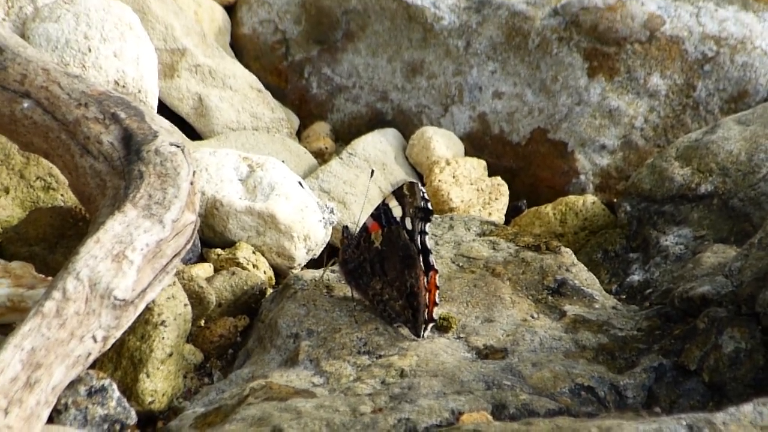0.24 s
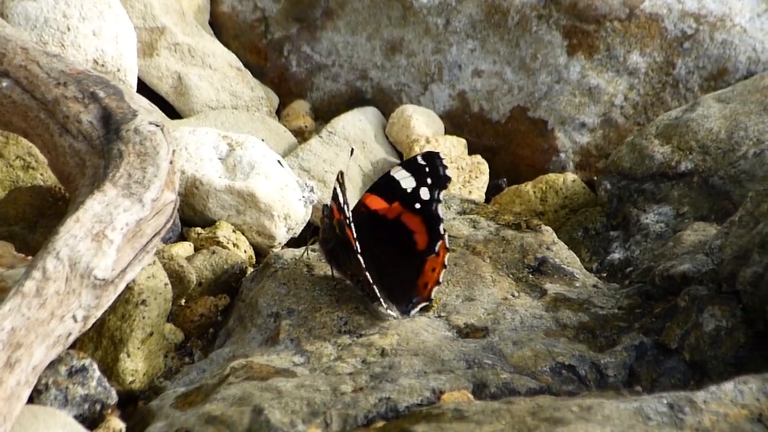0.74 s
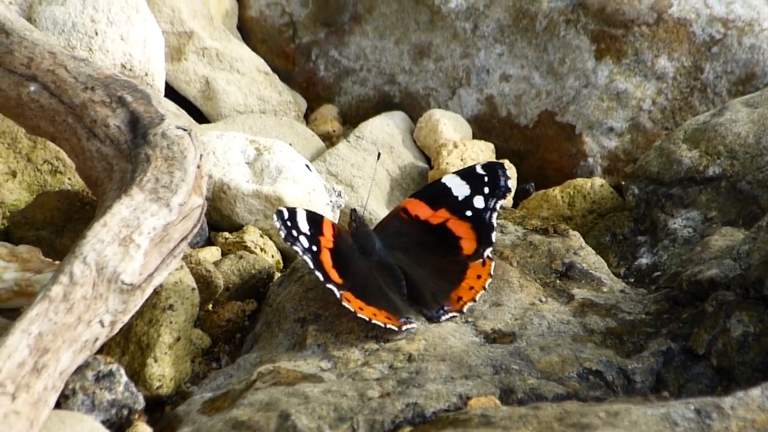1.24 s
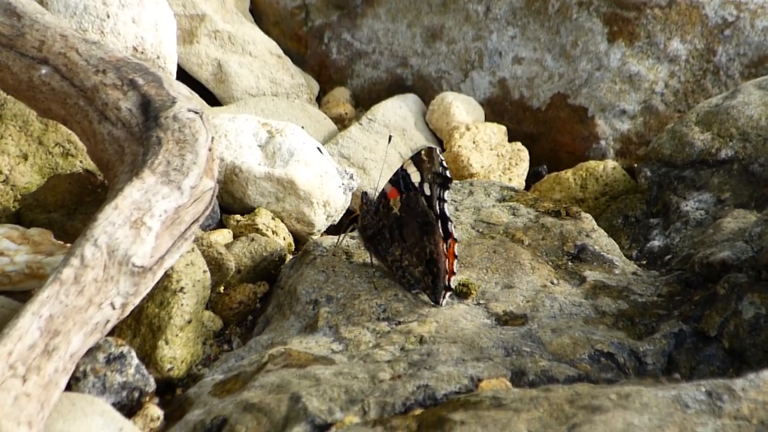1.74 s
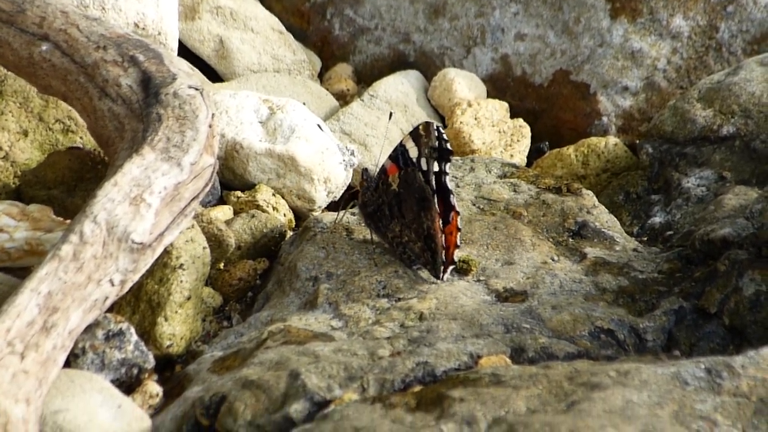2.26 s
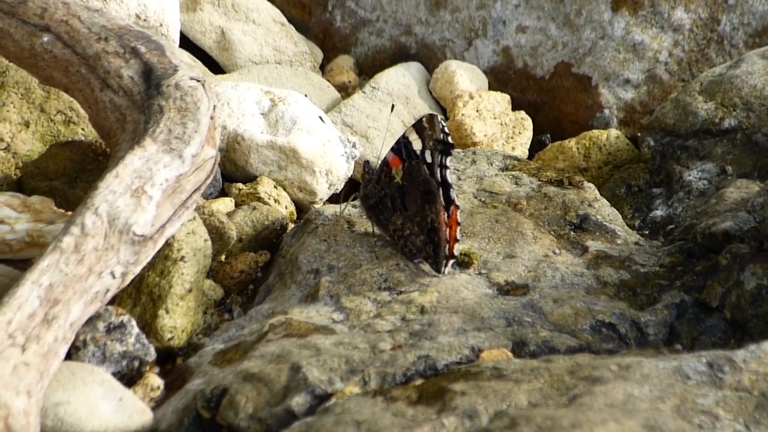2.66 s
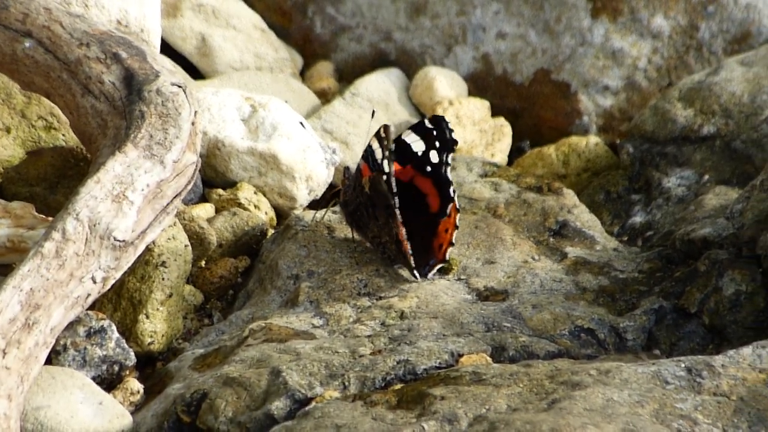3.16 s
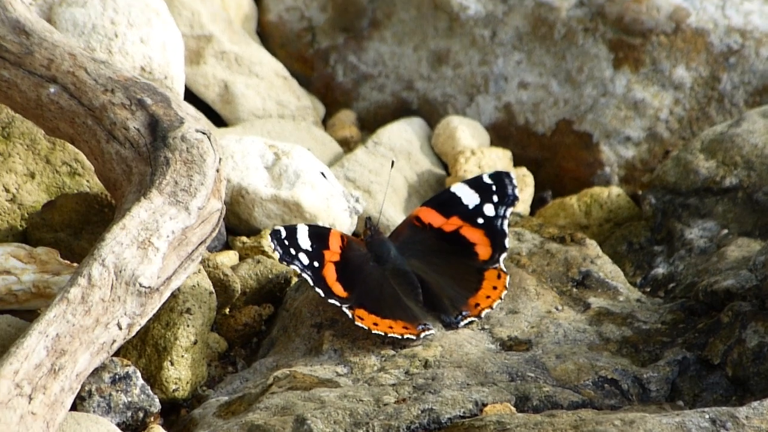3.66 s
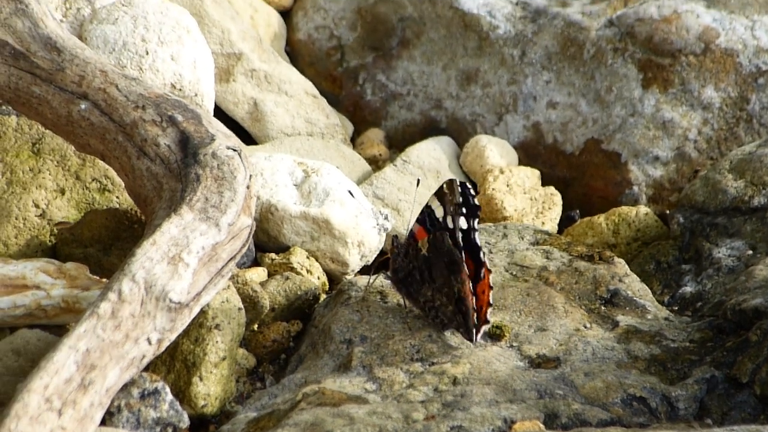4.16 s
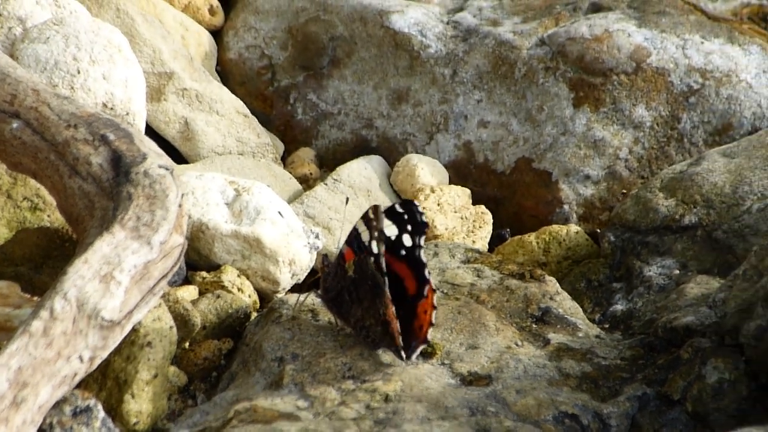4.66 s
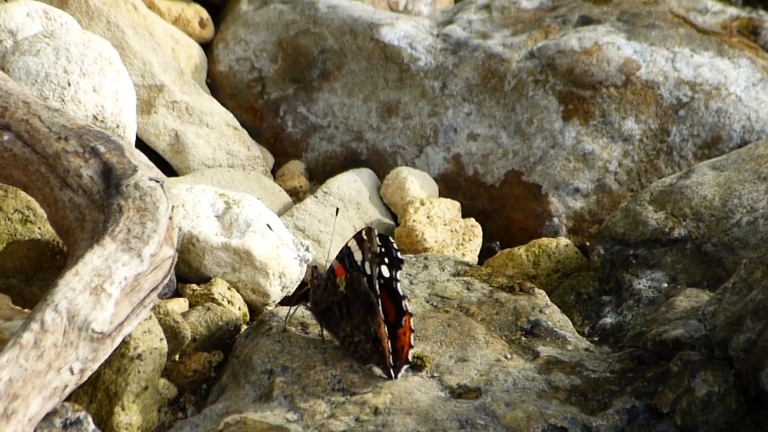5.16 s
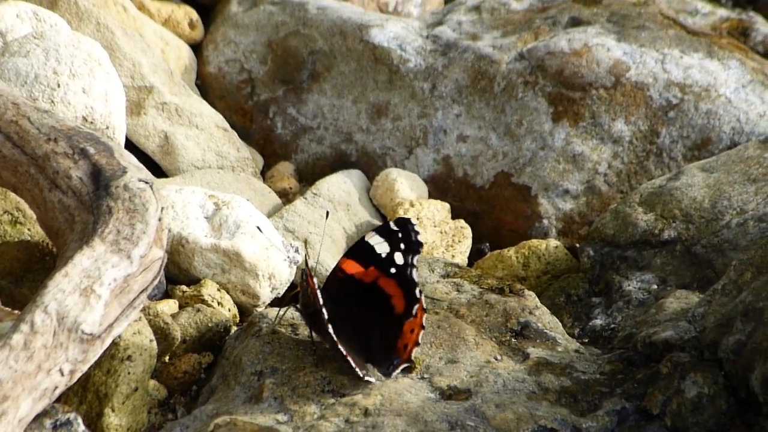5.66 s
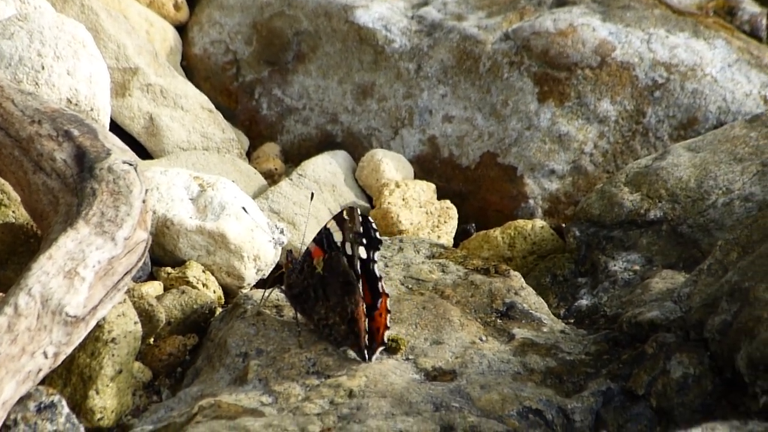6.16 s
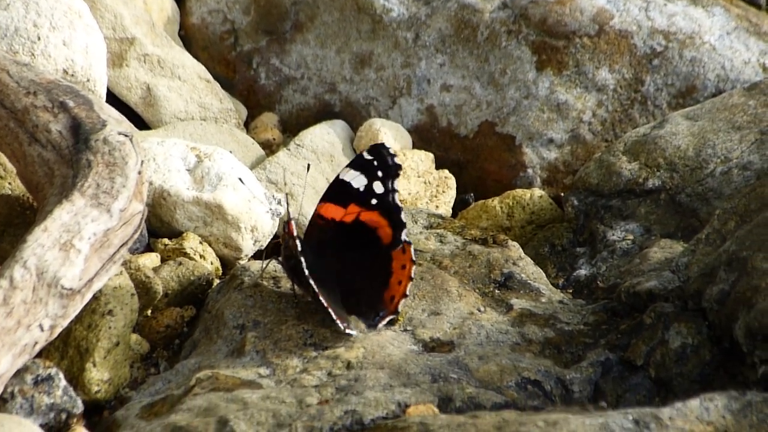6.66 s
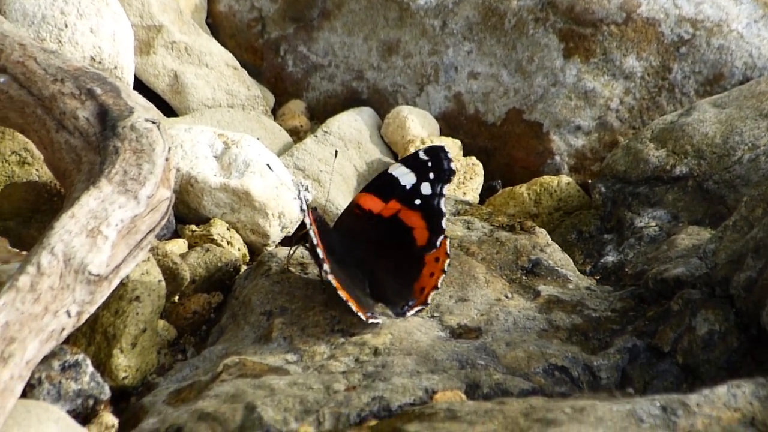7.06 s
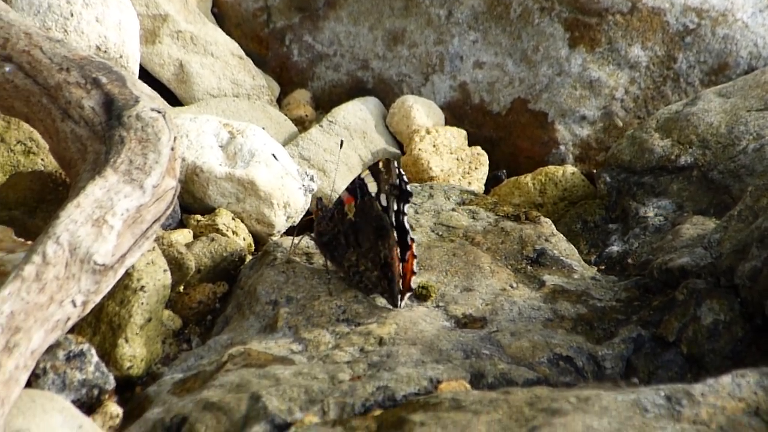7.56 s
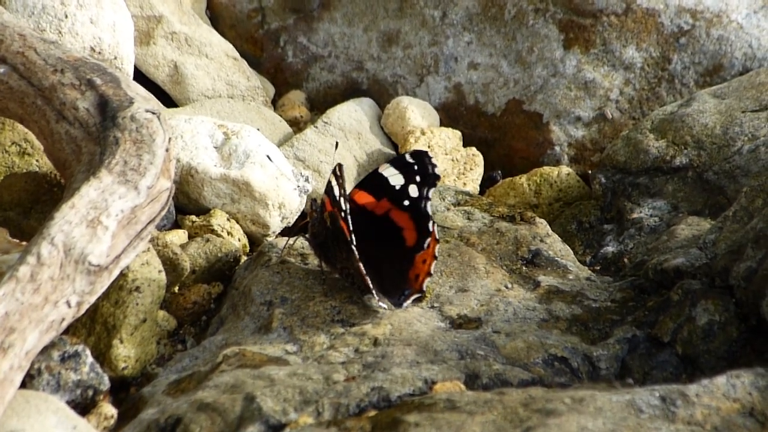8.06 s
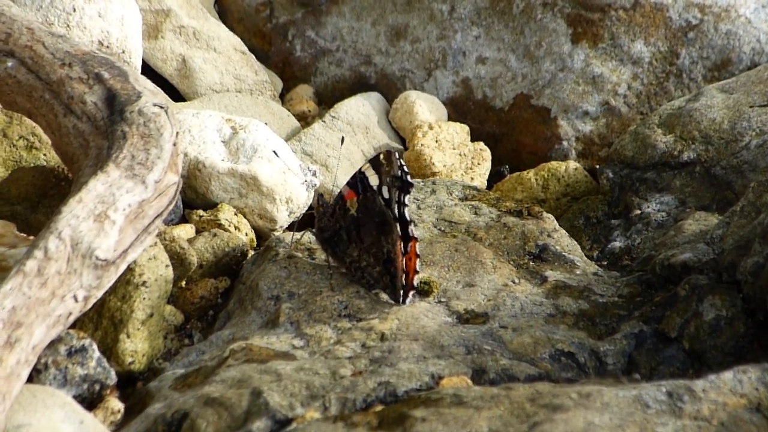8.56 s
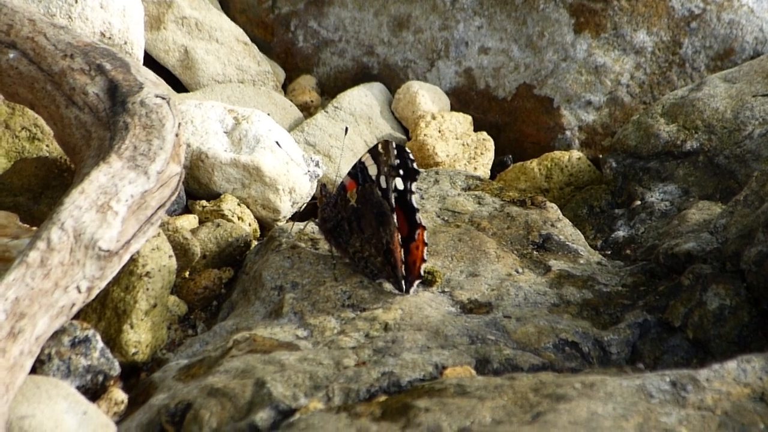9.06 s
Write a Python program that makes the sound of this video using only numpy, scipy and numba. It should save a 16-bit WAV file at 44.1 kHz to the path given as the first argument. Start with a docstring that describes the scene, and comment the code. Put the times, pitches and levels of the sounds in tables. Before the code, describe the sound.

Close among rocks, little waves lap, splash and drain with crackling bubbles and ringing drops, while light wind softly buffets the microphone.

```python
"""A stony shore, heard from close among the rocks: small waves run up, slosh between stones and drain fizzing.
Slosh, fizz and trickle are crowds of short ringing bubbles, the first two over shaped noise.
Crests slap in short bursts, air pockets glug as gliding sines and drops fall back as ringing ticks.
Water farther along the shore hisses almost steadily, as noise coming without echoes from the rocks.
Gusts of a light breeze rumble on the two microphone ports, as lumpy low noise."""
import sys
import numpy as np
from scipy import signal
from scipy.fft import rfft, irfft, next_fast_len
from scipy.io import wavfile
from numba import njit

SR = 44100
rng = np.random.default_rng(int(sys.argv[2]) if len(sys.argv) > 2 else 0)


def to_wav(sig):
    """Store sig (one row per channel, or 1-D mono) as 16-bit WAV at the path in sys.argv[1].

    Samples outside -1..1 are clipped; the rate is SR.
    """
    pcm = np.clip(np.atleast_2d(sig), -1, 1) * 32767
    pcm = np.round(pcm).astype(np.int16)
    wavfile.write(sys.argv[1], SR, pcm.T)  # frames by channels


N = 411012   # length in samples

# spectrum shared by fizz and spray, with a peak near 4 kHz and a dip near 2.6 kHz: f/Hz, relative level per
# Hz/dB
FIZZ_COLOUR = [(1800, -1), (2600, -5), (3300, -2.5), (4050, 5.5), (4450, 4), (6500, 2.5), (8000, 0),
               (10000, -9.5), (12500, -17), (16000, -37)]
# stereo width of the shore at the two ports: f/Hz, side against mid/dB
SHORE_SPREAD = [(60, -11), (300, 2.5), (700, 0), (1300, -4), (4400, -15.5), (8000, -8.5)]


def water_levels(calm_slosh_db=-54.5, calm_fizz_db=-51.5, foam_lag_s=0.0061):
    """Slosh and fizz levels in dB: calm water, waves and slaps add in power; wave fizz lags the water a little."""
    # waves: t/s, run-up/s, wash/s, drain rate/(dB/s), slosh level/dB, fizz level/dB
    waves = [(0.4, 0.02, 0.33, 35, -48.5, -50), (0.73, 0.004, 0.14, 12.5, -44.5, -40),
             (1.15, 0.044, 1.47, 57, -44.5, -39.5), (2.92, 0.21, 1, 9, -48.5, -48.5),
             (3.66, 0.22, 0.62, 11.5, -39.5, -36.5), (6.16, 0.18, 0.58, 19, -37, -34.5),
             (8.3, 0.13, 0.68, 13, -50, -46.5)]
    # crests slapping on a stone and collapsing: t/s, slosh level/dB, fizz level/dB
    slaps = [(0.462, -41, -40.5), (0.745, -44.5, -31.5), (1.469, -40, -31), (2.485, -32, -32),
             (2.685, -37, -37), (3.902, -34, -35), (3.968, -50, -32.5), (4.047, -49, -28),
             (4.097, -37, -39), (4.401, -33.5, -28), (4.467, -40, -30.5), (4.877, -45, -28.5),
             (5.269, -60, -38), (6.277, -41.5, -26.5), (6.548, -35, -25.5), (6.766, -30, -27.5),
             (6.868, -38, -28), (6.909, -38, -32.5), (7.405, -44, -33.5)]
    body_power = from_db(calm_slosh_db) ** 2
    foam_power = from_db(calm_fizz_db) ** 2
    for s, run_up, wash, drain, slosh_db, fizz_db in waves:
        water = swell(s, run_up, wash, drain)
        foam = swell(s + foam_lag_s, run_up, wash, drain)
        body_power = body_power + (from_db(slosh_db) * water) ** 2
        foam_power = foam_power + (from_db(fizz_db) * foam) ** 2
    for s, slosh_db, fizz_db in slaps:
        burst = swell(s, attack_s=0.001, hold_s=0.011, fall_db_per_s=271)
        body_power = body_power + (from_db(slosh_db) * burst) ** 2
        foam_power = foam_power + (from_db(fizz_db) * burst) ** 2
    return 10 * np.log10(body_power), 10 * np.log10(foam_power)


def slosh(level_db, spill, gurgle_top_hz=1650):
    """Large, low bubbles over a soft churn; the harder the water runs, the more the bubbles take over."""
    # colour of the wave body: f/Hz, relative level per Hz/dB
    body_colour = [(230, -34), (380, -8.5), (520, -3.5), (750, 4), (1050, 4.5), (1550, 0.5), (2200, 1),
                   (2600, -1), (3400, -6)]
    low_colour = [(hz, db) for hz, db in body_colour if hz < gurgle_top_hz]
    crowd = from_db(0.25 * (level_db - level_db.mean()))
    gurgle = bubbles(low_colour, 680 * crowd * spill, cycles=42, rise=0.5, size_spread_db=3.9)
    gurgle = gurgle * np.sqrt(crowd)
    churn = spill * stereo_noise(body_colour, SHORE_SPREAD)
    surge_db = 1.2 * drift(17)
    return from_db(level_db + surge_db) * (from_db(-1.5) * gurgle + from_db(-5.0) * churn)


def fizz(level_db, spill):
    """Tiny bubbles burst in dense, merging clusters as water drains through the stones."""
    crackle = bubbles(FIZZ_COLOUR, 2000 * spill ** 2, cycles=18, rise=0.02, size_spread_db=4.5)
    foam = stereo_noise(FIZZ_COLOUR, SHORE_SPREAD)
    surge_db = 1.2 * drift(12.6)
    return from_db(level_db + surge_db) * (from_db(-3.0) * crackle + from_db(-3.5) * foam)


def trickle(level_db, spill):
    """Running water spits off the stones in flurries of very short plips."""
    # colour of the spitting: f/Hz, relative level per Hz/dB
    spit_colour = [(1100, -7.5), (1550, 7.5), (2100, 3.5), (2600, -6.5), (3300, 5.5), (5000, -1)]
    running = from_db(level_db - level_db.max())
    plips = bubbles(spit_colour, 650 * np.sqrt(running) * spill, cycles=15, rise=0, size_spread_db=4.4)
    return from_db(level_db - 5.5) * plips


def drops(cycles=10, spatter_cycles=5, spatter_t60=0.11, spray_db=-3, impact_db=-8,
          linger_db=-5, linger_cycles=60, linger_t60=0.16):
    """A drop ticks and rings; a spatter of like droplets and fine spray follows, and their pitch lingers."""
    # drops on water and stone: t/s, relative ring peak/dB, ring f/Hz, spatter against ring peak/dB
    falls = [(0.451, -20.5, 8400, -19), (0.468, -28, 1930, -15), (0.749, -24, 2120, -22),
             (1.021, -21.5, 6340, -15), (1.3352, -14.5, 3900, -15.5), (1.4712, -19, 4900, -22),
             (1.4965, -20, 8400, -12), (1.546, -14.5, 8740, -19), (1.694, -18.5, 3870, -16.5),
             (1.792, -22.5, 3550, -16), (1.929, -9.5, 5940, -22.5), (1.976, -26, 3900, -26),
             (2.003, -9.5, 4470, -20), (2.331, -22.5, 2850, -14), (2.4873, -15.5, 3020, -18),
             (2.4974, -15, 1337, -29), (2.516, -17.5, 3150, -36), (2.722, -26, 1430, -15),
             (2.910, -22.5, 5500, -10), (3.04, -23.5, 5260, -11.5), (3.237, -27, 4030, -11.5),
             (3.303, -39.5, 1280, -3), (3.903, -27, 2740, -10.5), (4.189, -22.5, 1860, -18),
             (4.194, -16.5, 3640, -29), (4.254, -13, 2700, -15.5), (4.417, -19.5, 1400, -21),
             (4.468, -15, 1200, -15), (4.5965, -14, 7500, -14.5), (4.761, -28, 4080, -8),
             (5.2, -21.5, 3970, -12.5), (5.480, -17.5, 4200, -20), (6.158, -29.5, 8000, -9.5),
             (6.272, -7.5, 5120, -26), (6.9683, -21.5, 2380, -6), (7.009, -18.5, 7800, -16),
             (7.1169, -21, 3280, -10.5), (7.218, -14, 5740, -16.5), (7.321, -27.5, 2190, -10.5),
             (7.408, -21, 3070, -20), (7.4237, -21, 3060, -26), (7.535, -28.5, 2280, -14),
             (7.859, -33.5, 2830, -17), (8.678, -31, 1020, -11), (8.7065, -21.5, 6740, -21),
             (9.086, -30, 6500, -12), (9.131, -34.5, 1460, -6)]
    out = np.zeros(N)
    t = np.arange(SR // 6) / SR
    tick = 1. * (t == 0)
    sprays = stereo_noise(FIZZ_COLOUR, SHORE_SPREAD)[0]
    for s, peak_db, hz, spatter_db in falls:
        # two resonances in a row soften the start
        plip = ring(ring(tick, hz, cycles), hz, cycles)
        plip = plip / np.abs(plip).max()
        droplets = rng.standard_normal(len(t)) * rng.exponential(1, len(t))
        spray = sprays[round(s * SR):][:len(t)]
        spatter = rms_one(ring(ring(droplets, hz, spatter_cycles), hz, spatter_cycles))
        spatter = from_db(-60 * t / spatter_t60) * (spatter + from_db(spray_db) * spray)
        linger = rms_one(ring(droplets[::-1], hz, linger_cycles))
        linger = from_db(linger_db - 60 * t / linger_t60) * linger
        tail = from_db(spatter_db) * (spatter + linger)
        add(out, s, from_db(peak_db) * (from_db(impact_db) * tick + plip + tail))
    return out


def glugs(fade_db=6.0, flutter=0.4, wobble=0.023, companion_db=-14, companion_spread=0.448,
          overtone=1.85, overtone_db=-14, count=3):
    """Trapped air rings, climbing near the surface or sinking when dragged down; smaller pockets split off."""
    # air pockets closing between stones: t/s, relative level/dB, start f/Hz,
    # f before wobble one length later/Hz, length/s
    pockets = [(0.404, -35, 1104, 1300, 0.02), (0.611, -43, 615, 540, 0.038), (0.72, -35, 665, 715, 0.018),
               (0.793, -41.5, 713, 530, 0.067), (1.386, -25.5, 1070, 1190, 0.016),
               (1.434, -32, 1140, 1070, 0.012), (1.528, -43, 292, 350, 0.042),
               (1.664, -37.5, 674, 766, 0.035), (2.024, -35, 513, 935, 0.042),
               (2.258, -35.5, 624, 1410, 0.054), (2.516, -31.5, 655, 1470, 0.064),
               (2.753, -41, 860, 695, 0.03), (2.951, -36, 750, 710, 0.031), (3.027, -42.5, 666, 640, 0.023),
               (3.116, -44, 960, 737, 0.05), (3.171, -43.5, 651, 1000, 0.054),
               (3.257, -47.5, 480, 737, 0.049), (3.723, -37.5, 605, 775, 0.053),
               (3.793, -41, 574, 716, 0.043), (3.9, -21.5, 920, 1690, 0.014),
               (4.046, -35.5, 560, 438, 0.053), (4.313, -37, 562, 605, 0.058),
               (4.473, -27, 652, 1036, 0.029), (4.85, -41, 553, 1710, 0.044),
               (6.195, -41.5, 475, 915, 0.038), (6.41, -32.5, 1004, 1160, 0.024),
               (6.738, -33, 444, 576, 0.034), (6.849, -28, 830, 1110, 0.02), (6.91, -27, 904, 1235, 0.021),
               (7.36, -35.5, 946, 1430, 0.027), (7.518, -37, 487, 626, 0.039),
               (7.579, -30.5, 990, 1090, 0.011), (7.643, -39, 960, 1090, 0.019),
               (8.55, -43.5, 722, 925, 0.046)]
    out = np.zeros(N)
    shake = 1 + flutter * drift(74)       # level flutter
    squeeze = 1 + wobble * drift(153)     # pitch wobble
    rattle = from_db(overtone_db) * drift(120)
    for s, level_db, first_hz, last_hz, length in pockets:
        for k, (late, small) in enumerate(rng.random((count, 2))):
            split = k > 0
            # a smaller pocket rings higher and is gone sooner
            shrink = 1 + split * companion_spread * small
            start = s + split * late * length
            age = np.arange(SR // 10) / SR / length * shrink   # in pocket lengths
            now = round(start * SR) + np.arange(len(age))
            glide = (last_hz / first_hz) ** np.minimum(age, 1.2) ** 1.66
            phase = 2 * np.pi * np.cumsum(shrink * first_hz * glide * squeeze[now]) / SR
            fade = from_db(level_db + split * companion_db - fade_db * age)
            envelope = (1 - np.exp(-age / 0.26)) * fade / (1 + age ** 10)
            add(out, start, envelope * (np.sin(phase) + rattle[now] * np.sin(overtone * phase)))
    return from_db(4.0) * out * shake


def among_rocks(x, t60=0.12, mid_db=-14, side_db=-18.5):
    """Nearby boulders scatter the sound in a short spray of echoes, different at each port."""
    t = np.arange(SR // 8) / SR
    echoes = rng.standard_normal((2, len(t))) * from_db(-60 * t / t60)
    echoes /= np.linalg.norm(echoes, axis=1, keepdims=True)
    mid, side = signal.oaconvolve(x.mean(axis=0, keepdims=True), echoes)[:, :N]
    return x + from_db(mid_db) * mid + from_db(side_db) * side * [[1], [-1]]


def far_shore():
    """Water farther along the shore blends into a hiss whose level drifts only slightly."""
    # colour of the distant water: f/Hz, relative level per Hz/dB
    distant_colour = [(25, -11), (60, -4.5), (150, 2), (650, 3.5), (1000, 3.5), (1700, -3.5), (2900, -9),
                      (4050, 1.5), (5500, 3.5), (7500, -0.5), (10000, -11), (16000, -25)]
    level_db = -48 + 1.0 * drift(3.4)
    return from_db(level_db) * stereo_noise(distant_colour, SHORE_SPREAD)


def breeze(lumps_db=3.5, build_share=0.37, drop_db_per_s=96):
    """Eddies buffet the ports in lumps under each gust, which builds for a share of its length, then blows."""
    # gusts: t/s, length before dropping away/s, rumble level before the lumps/dB
    gusts = [(0.216, 0.99, -37), (1.37, 0.51, -46.5), (3.972, 0.89, -34), (4.717, 0.86, -36.5),
             (6.577, 0.6, -36.5), (7.29, 0.07, -37), (7.41, 0.8, -38), (8.332, 0.14, -41.5),
             (8.59, 0.33, -42), (9.07, 0.19, -38.5)]
    # colour of the rumble: f/Hz, relative level per Hz/dB
    rumble_colour = [(45, -51), (70, -25), (100, -7.5), (150, -2.5), (220, 1), (330, -2.5), (480, -8.5),
                     (700, -21), (1400, -39)]
    # close ports hear turbulence mostly in opposite phase: f/Hz, side against mid/dB
    rumble_spread = [(60, 4), (120, 5.5), (250, 15), (500, 15.5)]
    power = np.zeros(N)
    for s, length, db in gusts:
        gust = swell(s, build_share * length, (1 - build_share) * length, drop_db_per_s)
        power += (from_db(db) * gust) ** 2
    lumps = from_db(lumps_db * drift(24))
    return np.sqrt(power) * lumps * stereo_noise(rumble_colour, rumble_spread)


def swell(start, attack_s, hold_s, fall_db_per_s):
    """A gain that rises evenly to 1, holds and dies away."""
    out = np.zeros(N)
    age = np.arange(0, attack_s + hold_s + 60 / fall_db_per_s, 1 / SR)
    fall_db = -fall_db_per_s * np.maximum(age - attack_s - hold_s, 0)
    add(out, start, np.minimum(age / attack_s, 1) * from_db(fall_db))
    return out


def spills(strength, per_s=50, drain_s=0.012):
    """Water tips over stone after stone: each spill starts at once and drains away; a gain with rms 1."""
    kicks = (rng.random(N) < per_s / SR) * rng.random(N) ** 2
    draining = signal.lfilter([1], [1, -np.exp(-1 / (drain_s * SR))], kicks)
    return rms_one(1 + 2 * strength * draining)


def bubbles(spectrum, per_s, cycles, rise, size_spread_db, largest_share=0.02):
    """Bubbles of any pitch are born at random and ring, gliding up by rise on average; most are small; rms 1."""
    born = np.flatnonzero(rng.random(N) < per_s / SR)
    pitch, size, life, climb = rng.random((N, 4))[born].T
    low_hz, high_hz = spectrum[0][0], spectrum[-1][0]
    hz = low_hz * (high_hz / low_hz) ** pitch
    # the smallest draws make the tallest bubbles; a few share the full size
    size_gain = from_db(-size_spread_db * np.log(np.maximum(size, largest_share)))
    # high bubbles die sooner, so they need more height for the same power per Hz
    height = hz * at_hz(spectrum, hz) * size_gain
    return rms_one(chirps(born, hz, height, cycles * (.5 + life), 2 * rise * climb))


@njit
def chirps(starts, hz, heights, cycles, rise):
    """Sum of softly starting sines that die by 60 dB in so many cycles, each gliding up by its share rise."""
    out = np.zeros(N)
    for k in range(len(starts)):
        size = cycles[k] * SR / hz[k]   # life in samples
        step = hz[k] / SR               # cycles per sample
        fade = np.exp(-np.log(1000) / size)
        opening = np.exp(-step)
        height, closed, phase = heights[k], 1., 0.
        for i in range(min(int(size), N - starts[k])):
            phase += 2 * np.pi * step * (1 + rise[k] * i / size)
            height *= fade
            closed *= opening
            out[starts[k] + i] += height * (1 - closed) * np.sin(phase)
    return out


def stereo_noise(spectrum, width):
    """Smooth noise of a given colour and width, fading beyond the ends of its spectrum; rms 1."""
    size = next_fast_len(N)
    hz = np.arange(size // 2 + 1) * SR / size
    skirts = np.minimum(hz / spectrum[0][0], 1) ** 2 / np.maximum(hz / spectrum[-1][0], 1) ** 2
    mid, side = rfft(rng.standard_normal((2, size))) * at_hz(spectrum, hz) * skirts
    spread = at_hz(width, hz)
    ports = (mid + spread * side * [[1], [-1]]) / np.hypot(1, spread)
    return rms_one(irfft(ports, size)[:, :N])


def ring(push, hz, cycles):
    """A band-pass resonance that dies by 60 dB in so many cycles."""
    r = from_db(-60 * hz / (cycles * SR))
    w = 2 * np.pi * hz / SR
    return signal.lfilter([1, 0, -1], [1, -2 * r * np.cos(w), r * r], push + 1e-18)


def drift(rate_hz):
    """Slow random wandering with spread 1: noise through two equal low-pass poles at rate_hz."""
    step = 40   # samples between computed points
    r = np.exp(-2 * np.pi * rate_hz * step / SR)
    noise = rng.standard_normal(N // step + 2002)
    slow = signal.lfilter([1], [1, -2 * r, r * r], noise)[2000:]   # settled part only
    return np.interp(np.arange(N) / step, np.arange(len(slow)), rms_one(slow))


def from_db(db):
    """Decibels to gain."""
    return 10 ** (np.asarray(db) / 20)


def rms_one(x):
    """Scale to unit power."""
    return x / np.sqrt(np.mean(x ** 2) + 1e-20)


def at_hz(points, hz):
    """Gain of a dB table, read on a log-frequency axis."""
    known_hz, db = np.transpose(points)
    return from_db(np.interp(np.log(hz + 1), np.log(known_hz), db))


def add(out, s, sound):
    """Mix a short sound in at time s."""
    start = max(round(s * SR), 0)
    out[..., start:start + sound.shape[-1]] += sound[..., :N - start]


def scene():
    """Near water among the rocks, the far shore and the breeze."""
    slosh_db, fizz_db = water_levels()
    spill = spills(strength=0.52)   # trickle and fizz share their spills
    water = slosh(slosh_db, spills(strength=0.55))
    water = water + trickle(slosh_db, spill) + fizz(fizz_db, spill)
    water = water + drops() + glugs()
    return from_db(-1) * among_rocks(water) + far_shore() + breeze()


def record(dry, cutoff_hz=15900):
    """A steep low-pass filter cuts the top of the treble."""
    low_pass = signal.ellip(10, .1, 70, cutoff_hz, fs=SR, output="sos")   # ripple and stop band in dB
    return signal.sosfilt(low_pass, dry)


dry = scene()
out = record(dry)
to_wav(out)
```